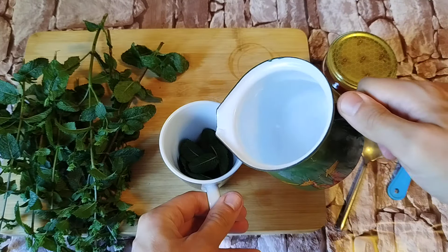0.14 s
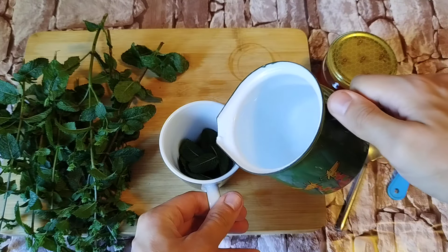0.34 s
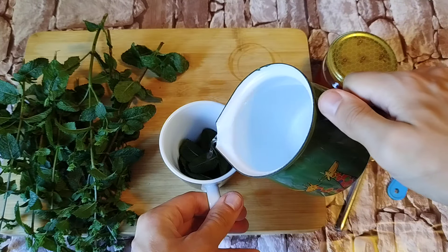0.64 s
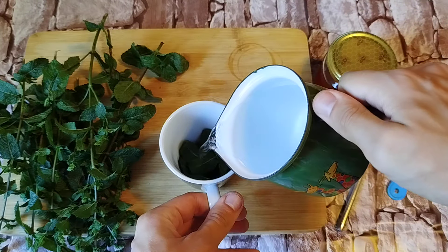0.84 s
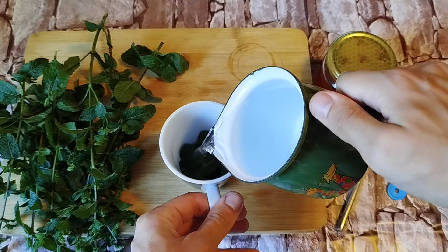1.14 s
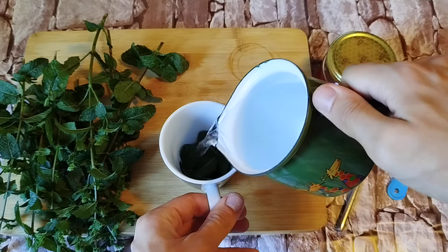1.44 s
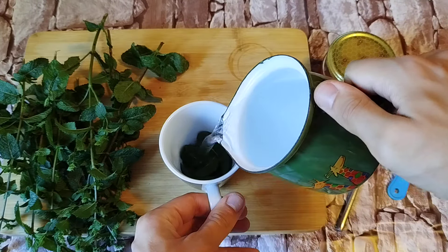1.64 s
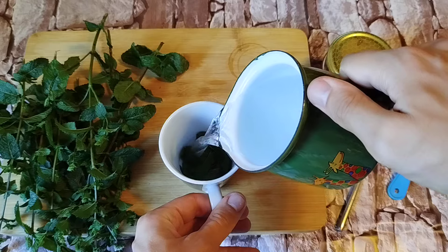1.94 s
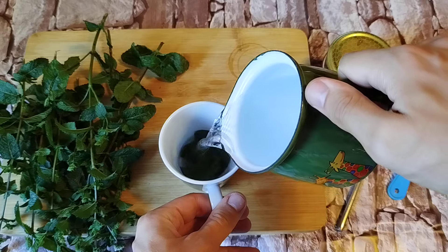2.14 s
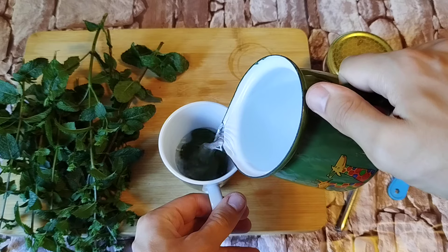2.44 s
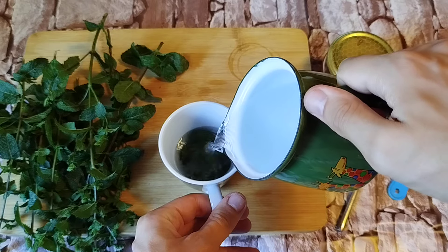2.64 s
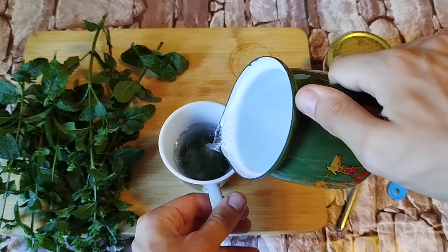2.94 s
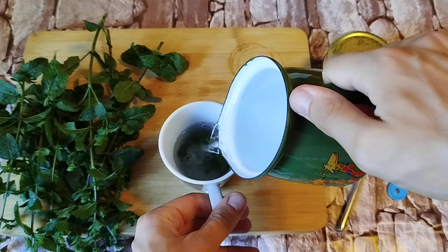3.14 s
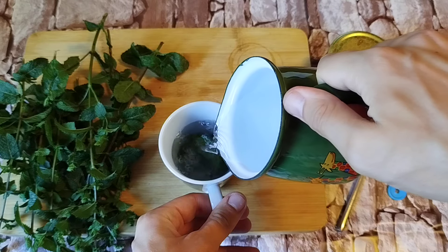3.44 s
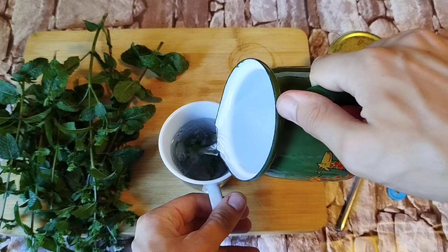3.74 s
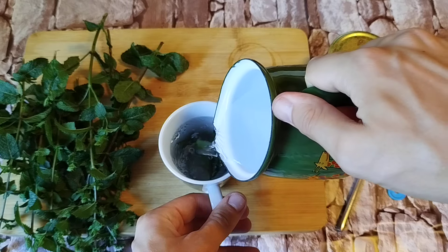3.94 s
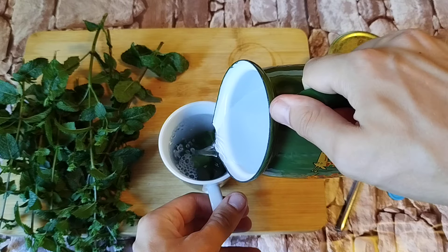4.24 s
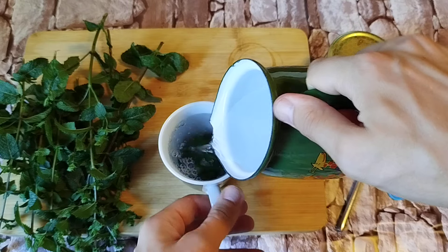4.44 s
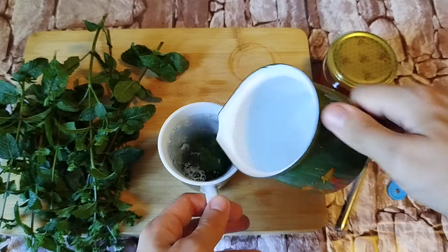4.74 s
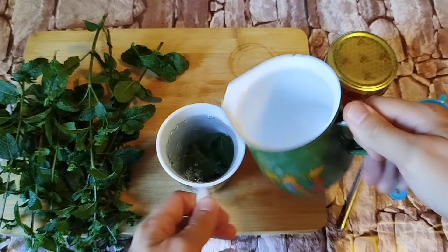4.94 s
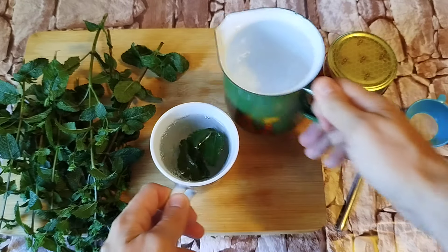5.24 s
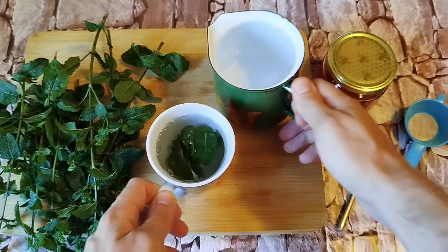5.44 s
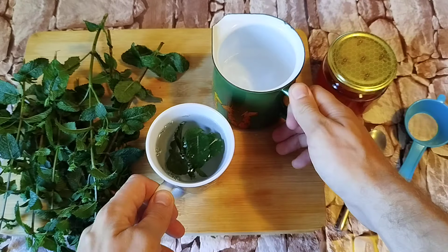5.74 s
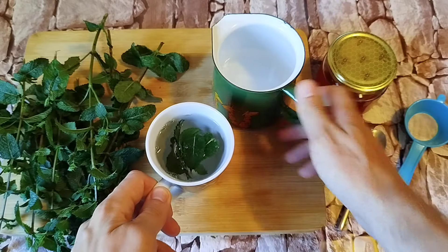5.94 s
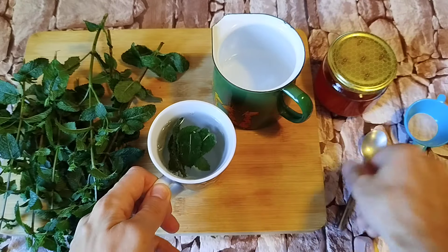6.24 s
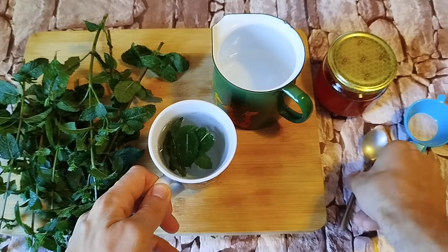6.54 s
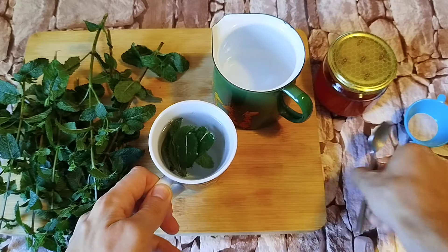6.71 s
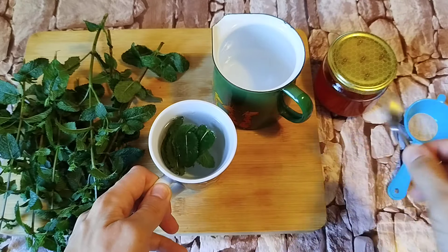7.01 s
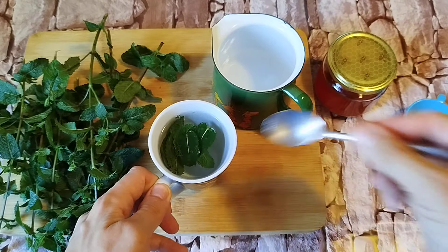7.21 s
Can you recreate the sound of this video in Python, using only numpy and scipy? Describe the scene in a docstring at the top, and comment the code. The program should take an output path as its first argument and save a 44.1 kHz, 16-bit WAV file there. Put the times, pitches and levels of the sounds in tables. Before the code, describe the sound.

Close stereo sound in a small quiet room: a short metallic bump, then about four seconds of uneven, gurgling water poured into a mug, strongest early on and thinning later, with crisp droplets on top. A sharp ceramic knock ends the pour. A short sliding scrape follows, then a low, solid thump of the metal jug on a board, small finger taps, a dragged spoon and a tiny high ring.

```python
"""A bump leaves a jug ringing; then hot water trickles from it onto mint leaves in a ceramic mug.
Bubbles, built from short swelling tones, sound through the shrinking air space; droplets tick.
The jug knocks the mug as it tips back: cracks of noise and fading tones. The mug is slid aside (shaped noise)
and the jug set down on a wooden board. Then a spoon is dragged off a mat and sings as it is lifted.
Soft noise throughout is the small quiet room, heard by a pair of close microphones."""
import sys
import numpy as np
from scipy import signal
from scipy.fft import rfft, irfft, next_fast_len
from scipy.io import wavfile
from scipy.ndimage import uniform_filter1d

SR = 44100
rng = np.random.default_rng(int(sys.argv[2]) if len(sys.argv) > 2 else 0)


def wrap_up_sound(samples):
    """Save the sound to the file named by the first command line argument, as 16-bit audio."""
    columns = np.atleast_2d(samples).T
    # keep every value between -1 and 1, then stretch to whole-number steps
    tamed = np.clip(columns, -1, 1)
    steps = np.round(tamed * 32767).astype(np.int16)
    wavfile.write(sys.argv[1], SR, steps)


N = 325017


def from_db(db):
    """Turn decibels into a gain."""
    return 10 ** (np.asarray(db) / 20)


def rms_one(x):
    """Scale a sound to an average (rms) level of 1."""
    return x / np.sqrt(np.mean(x ** 2) + 1e-20)


def at_hz(points, hz):
    """Read a table of (frequency, value), spacing frequencies as the ear does (log)."""
    f, value = np.transpose(points)
    return np.interp(np.log(hz + 1e-3), np.log(f), value)


def add(out, s, sound):
    """Mix a sound in, starting at s seconds."""
    i = max(round(s * SR), 0)
    out[..., i:i + sound.shape[-1]] += sound[..., :N - i]


def clicks(rows):
    """One single-sample click for each row of (time [s], level [dB])."""
    out = np.zeros(N)
    for s, db in rows:
        add(out, s, from_db([db]))
    return out


def decay(t60):
    """A second of fading; t60 is the time to fall by 60 dB [s]."""
    return np.exp(-np.log(1000) * np.arange(SR) / SR / t60)


def stroke(s, length_s, attack_s, release_s):
    """Gain of one push: it builds up, holds until its length is over and dies away."""
    age = np.arange(N) / SR - s
    return np.clip(age / attack_s, 0, 1) * np.exp(-np.maximum(age - length_s, 0) / release_s)


def flutter(depth_db, rate):
    """Uneven grip or sputter: the level wanders to a new random value rate times a second."""
    steps = np.arange(N) / SR * rate
    return from_db(depth_db * np.interp(steps, np.arange(N), rng.standard_normal(N)))


def resonator(hz, width):
    """One resonance as filter terms, and the gain that brings its peak to about 1."""
    r = np.exp(-np.pi * width / SR)
    poles = [1, -2 * r * np.cos(2 * np.pi * hz / SR), r * r]
    return [1, 0, -1], poles, (1 - r * r) / 2


def resonate(x, modes):
    """A body answers at several pitches at once: side-by-side resonances with alternating signs."""
    out = 0
    for k, (hz, width, db) in enumerate(modes):
        zeros, poles, gain = resonator(hz, width)
        out = out + (-1) ** k * from_db(db) * gain * signal.lfilter(zeros, poles, x + 1e-18)
    return out


# how alike left and right are for sounds from the table: (frequency [Hz], correlation)
LIKENESS = [(100, 0.975), (260, 0.92), (650, 0.7), (1100, 0.25), (4000, 0.0), (15000, 0.0)]


def noise(colour, size=N, likeness=LIKENESS):
    """Stereo hiss with a given balance of low and high, and a given left-right likeness; rms 1."""
    padded = next_fast_len(size)
    hz = np.arange(padded // 2 + 1) * SR / padded
    mid, side = rfft(rng.standard_normal((2, padded)))
    alike = np.clip(at_hz(likeness, hz), -1, 1)
    # the side part has opposite signs left and right, so it makes the ears differ
    pair = np.sqrt(1 + alike) * mid + np.sqrt(1 - alike) * side * [[1], [-1]]
    return rms_one(irfft(pair * from_db(at_hz(colour, hz)), padded)[:, :size])


# how long the room's echo takes to fall by 60 dB: (frequency [Hz], t60 [s])
ROOM_T60 = [(120, 0.41), (400, 0.4), (1000, 0.28), (4000, 0.41), (9000, 0.38), (15000, 0.27)]


def dying(colour):
    """A second of noise in which every band fades at the room's own rate."""
    hz, s, cells = signal.stft(noise(colour, size=SR), SR, nperseg=256)
    fade = from_db(-60 * s / at_hz(ROOM_T60, hz)[:, None])
    return signal.istft(cells * fade, SR)[1][:, :SR]


def place(x, lag_ms, pan_db, near_db, near_t60, wet_db):
    """Direct sound reaches the left microphone first; the mug's walls scatter it sideways, the room echoes."""
    late = np.interp(np.arange(N) - round(lag_ms * SR / 1000), np.arange(N), x)
    direct = np.array([x, late]) * from_db([[pan_db / 2], [-pan_db / 2]])
    near = rng.standard_normal(SR) * [[1], [-1]]
    far = rng.standard_normal((2, SR))
    answer = from_db(near_db) * rms_one(near * decay(near_t60))
    answer += from_db(wet_db) * rms_one(far * decay(at_hz(ROOM_T60, 2000)))
    return direct + signal.fftconvolve(x[None], answer / np.sqrt(SR), axes=1)[:, :N]


def pour():
    """The stream lands: bubbling water and snapping droplets, each placed before the microphones."""
    vigour = flow()
    return (place(water(vigour), lag_ms=0.099, pan_db=1.5, near_db=-6, near_t60=0.015, wet_db=-4)
            + place(droplets(vigour), lag_ms=.11, pan_db=2.5, near_db=-6.5, near_t60=0.071, wet_db=-3.5))


# vigour of the stream: it swells to its strongest near 2.5 s, then mostly slackens: (time [s], level [dB])
FLOW = [(0.75, -36), (1.15, -13.5), (1.45, -16), (1.78, -23.5), (2.1, -5.5), (2.45, -2), (2.75, -6.5),
        (2.98, -14), (3.18, -18), (3.33, -10.5), (3.65, -14), (4.15, -19.5), (4.64, -13.5)]
POUR_START_S, POUR_END_S = FLOW[0][0], FLOW[-1][0]
# moments when the stream drags a gulp of air under: (time [s], level [dB])
GULPS = [(1.877, -0.5), (2.367, 5), (2.525, -2), (2.8, -1.5), (3.11, -3), (3.289, 2.5), (3.475, 0)]
GULP_RISE_S, GULP_FALL_S = 0.026, 0.018


def flow():
    """Vigour of the stream as a gain: the slow tilt of the jug plus a short swell for each gulp."""
    s, db = np.transpose(FLOW)
    vigour = from_db(np.interp(np.arange(N) / SR, s, db, left=-150, right=-150))
    for s, db in GULPS:
        vigour += from_db(db) * stroke(s - GULP_RISE_S, GULP_RISE_S, GULP_RISE_S, GULP_FALL_S)
    return vigour


# each voice of the water: level where the flow is at 0 dB [dB], share of the flow's swing it follows
BUBBLING_DB, BUBBLING_FOLLOWS = -56, 0.89
FIZZ_DB, FIZZ_FOLLOWS = -62, 0.54
GURGLE_DB, GURGLE_FOLLOWS = -59.5, 1.31
# loud single bubbles, levels before the water's mix: (time [s], level [dB], pitch [Hz])
BUBBLES = [(1.135, -45, 2000), (1.236, -49.5, 1960), (1.385, -50, 890), (1.498, -51, 2050),
           (1.873, -40, 1895), (2.116, -45, 1180), (2.247, -43, 1110), (2.32, -35.5, 1184),
           (2.351, -44, 1110), (2.367, -39, 1270), (2.419, -42, 1190), (2.503, -38.5, 1270),
           (2.523, -31.5, 1217), (2.724, -45, 1140), (2.778, -47.5, 1250), (2.801, -52, 1480),
           (2.981, -45, 1910), (3.034, -46.5, 1180), (3.261, -44.5, 1140), (3.283, -42.5, 1260),
           (3.304, -34.5, 1904), (3.449, -43, 1920), (3.472, -45, 1770), (3.528, -43.5, 1360),
           (3.9, -39, 3140), (3.927, -47, 2000), (3.982, -43.5, 2960), (3.995, -48, 1930),
           (4.007, -48, 4320), (4.072, -45, 2990), (4.235, -45.5, 1880), (4.313, -47, 1870),
           (4.494, -43, 1770), (4.524, -41.5, 3520)]


def water(vigour):
    """Swarms of bubbles, fizz and low gurgle follow the flow; louder single bubbles ring on top."""
    large = BUBBLES + strays(count=14)
    bubbling = steady(mug_air(swarm(770, 2200, cycles=8.6, spread_db=15, count=900), column_db=-3.0))
    fizz = steady(mug_air(swarm(2397, 4410, cycles=25.5, spread_db=30, count=1500), column_db=-16))
    gurgle = steady(swarm(317, 847, cycles=6.6, spread_db=12, count=800))
    out = from_db(BUBBLING_DB) * vigour ** BUBBLING_FOLLOWS * bubbling
    out += from_db(FIZZ_DB) * vigour ** FIZZ_FOLLOWS * fizz
    out += from_db(GURGLE_DB) * vigour ** GURGLE_FOLLOWS * gurgle
    for s, db, hz in large:
        add(out, s - .0005, from_db(db - 1.0) * swelling_tone(hz, cycles=hz * 0.014, rise=.05))
    # each pinch-off also kicks the air in the mug
    kicks = clicks([row[:2] for row in large])
    return out + from_db(24.5) * resonate(kicks, AIR_MODES)


def swelling_tone(hz, cycles, rise):
    """Swells and dies within a set number of cycles; a bubble nearing the surface climbs in pitch (rise)."""
    age = np.arange(int(2 * cycles * SR / hz)) * hz / SR / cycles
    swell = age * np.exp(-8 * age)
    return swell / swell.max() * np.sin(2 * np.pi * cycles * (age + rise * (age - .5) * age / 2))


def swarm(low_hz, high_hz, cycles, spread_db, count):
    """Many small bubbles of random pitch, loudness and length during the pour."""
    out = np.zeros(N)
    for when, pitch, big, life in rng.random((count, 4)):
        hz = low_hz * (high_hz / low_hz) ** pitch
        sound = swelling_tone(hz, cycles * (.5 + life), rise=0.13)
        s = POUR_START_S + when * (POUR_END_S - POUR_START_S)
        add(out, s, from_db(spread_db * big ** 2) * sound)
    return out


# once the water is deep enough (start [s]), lesser bubbles join: level before the mix [dB], pitch range [Hz]
POOL_S, STRAY_DB, STRAY_LOW_HZ, STRAY_HIGH_HZ = 2.3, -54, 1520, 3330


def strays(count):
    """Lesser bubbles, one at a random moment in each equal share of the later pour."""
    when, pitch = rng.random((count, 2)).T
    s = POOL_S + (np.arange(count) + when) / count * (POUR_END_S - POOL_S)
    hz = STRAY_LOW_HZ * (STRAY_HIGH_HZ / STRAY_LOW_HZ) ** pitch
    return list(zip(s, np.full(count, STRAY_DB), hz))


def steady(x):
    """Even out the slow level of a stream of tiny sounds, leaving each tiny sound itself."""
    return x / np.sqrt(np.abs(uniform_filter1d(x * x, SR // 8)) + np.mean(x * x) / 100)


# lowest air resonance of the mug as it fills: (time [s], pitch [Hz])
AIR_PITCH = [(1.3, 905), (2.4, 1247), (3.0, 1332), (4.2, 1540)]


def air_column(x, width_hz, size=128):
    """The mug's lowest air resonance rises with the water; it is retuned every few milliseconds."""
    out, state = np.zeros(N), np.zeros(2)
    starts = np.arange(0, N, size)
    for i, hz in zip(starts, np.interp(starts / SR, *np.transpose(AIR_PITCH))):
        zeros, poles, gain = resonator(hz, width_hz)
        out[i:i + size], state = signal.lfilter(zeros, poles, x[i:i + size] + 1e-18, zi=state)
    return out * gain


# cross resonances of the mug's air: (frequency [Hz], width [Hz], level [dB])
AIR_MODES = [(1900, 148, -1.5), (2660, 970, -7), (2966, 180, 1), (3560, 180, -3), (4610, 930, -10.5)]


def mug_air(x, column_db):
    """Sound made at the water's surface leaves through the mug's air."""
    return from_db(column_db) * air_column(x, width_hz=153) - resonate(x, AIR_MODES)


# fine spray: level where the flow is at 0 dB, before flutter [dB], share of the flow's swing it follows
SPRAY_DB, SPRAY_FOLLOWS = -64, 0.38
# loud droplets on the surface, levels before the droplets' mix: (time [s], level [dB], pitch [Hz])
DROPS = [(0.7566, -42, 9660), (1.0706, -43.5, 10700), (1.4865, -40, 11200), (1.592, -37, 9350),
         (1.8712, -40, 6960), (1.9999, -40, 9900), (2.0694, -35.5, 9600), (2.2592, -37.5, 9440),
         (2.366, -31.5, 9750), (2.4695, -30.5, 7500), (2.5435, -35.5, 10900), (2.698, -39, 7700),
         (2.8897, -36, 8100), (3.032, -31, 12900), (3.475, -28, 8300), (3.7187, -39, 14800),
         (3.8997, -41, 7560), (4.466, -42, 10100)]
# colour of a droplet's snap: (frequency [Hz], width [Hz], level [dB])
SNAP = [(2800, 6900, -9), (7490, 2550, -3), (9700, 1420, -2), (14000, 2660, -3.5)]


def droplets(vigour):
    """Landing droplets snap and ring briefly over a mist of the finest bubbles."""
    # the finest bubbles tick, each at a pitch of its own
    mist = steady(resonate(swarm(4240, 17600, cycles=14, spread_db=22.5, count=3000), SNAP))
    out = from_db(SPRAY_DB) * vigour ** SPRAY_FOLLOWS * flutter(depth_db=2.5, rate=45) * mist
    hits = clicks([row[:2] for row in DROPS]) + spatter(count=60)
    out += from_db(12.5) * resonate(splashed(hits), SNAP)
    for s, db, hz in DROPS:
        add(out, s, from_db(db - 4.0) * swelling_tone(hz, cycles=13, rise=0))
    return out


# lesser droplets, before the droplets' mix: the faintest [dB], how far others rise above it [dB]
SPATTER_DB, SPATTER_RANGE_DB = -50.5, 6.5


def spatter(count):
    """Clicks of the lesser droplets at random moments, most of them faint."""
    when, size = rng.random((count, 2)).T
    s = POUR_START_S + when * (POUR_END_S - POUR_START_S)
    return clicks(zip(s, SPATTER_DB + SPATTER_RANGE_DB * size ** 2))


# a droplet's spray: level beside its click [dB], fading time t60 [s]
SPLASH_DB, SPLASH_T60 = 3, 0.029


def splashed(hits):
    """Each click throws a brief spray: a burst of noise that fades within a few hundredths of a second."""
    burst = rms_one(rng.standard_normal(SR) * decay(SPLASH_T60)) / np.sqrt(SR)
    return hits + from_db(SPLASH_DB) * signal.oaconvolve(hits, burst[:SR // 10])[:N]


def ringing(modes):
    """Struck things ring in fading tones; the higher ones reach the two microphones out of step."""
    out, t = np.zeros((2, SR)), np.arange(SR) / SR
    for k, (hz, db, t60) in enumerate(modes):
        alike = np.clip(at_hz(LIKENESS, hz), -1, 1)
        apart = np.arccos(alike) * (1 if alike > .5 else rng.choice([-1, 1]))
        phase = np.array([[apart], [-apart]]) / 2
        out += (-1) ** k * from_db(db) * decay(t60) * np.sin(2 * np.pi * hz * t + phase)
    return out


def blow(contacts, modes, board, colour, ring_db, board_db, crack_db, crack_t60, tail_db, rise_s):
    """Each contact cracks and echoes in the room; the hardest one sets the vessel and the board ringing."""
    out = np.zeros((2, N))
    onset = 1 - np.exp(-np.arange(SR) / SR / rise_s)
    for s, db in contacts:
        crack = from_db(crack_db) * noise(colour, size=SR) * decay(crack_t60)
        add(out, s, from_db(db) * onset * (crack + from_db(tail_db) * dying(colour)))
    body = from_db(ring_db) * ringing(modes) + from_db(board_db) * ringing(board)
    hardest_s = max(contacts, key=lambda row: row[1])[0]
    add(out, hardest_s, onset * body)
    return out


# the contact of the bump: (time [s], level [dB])
BUMP = [(0.0005, 0.5)]
# tones of the full jug, and of the board, before each blow's own level: (pitch [Hz], level [dB], t60 [s])
FULL_JUG = [(257.5, -43.5, 0.25), (339, -49, 0.35), (405, -42.5, 0.4), (887, -36, 0.22), (955, -43.5, 0.38),
            (2830, -35.5, 0.3), (3420, -52, 0.24), (3640, -47, 0.26), (4770, -49, 0.26), (5170, -37, 0.071),
            (8250, -51, 0.31)]
BOARD = [(122, -4, 0.19), (156.5, -0.5, 0.3), (273.3, 6.5, 0.079), (452.5, -5.5, 0.2), (1007, 5.5, 0.067)]
# dense clatter of the bump: (frequency [Hz], level [dB per Hz])
BUMP_COLOUR = [(41, -54), (70, -24), (145, -2.5), (412, -5.5), (541, -15), (913, -4.5), (1690, -33),
               (2910, -16), (3910, -24.5), (8280, -24.5), (16000, -48)]


def jug_bump():
    """The early bump sets the full jug ringing, with a short clatter."""
    return blow(BUMP, FULL_JUG, BOARD, BUMP_COLOUR, ring_db=-0.5, board_db=-41,
                crack_db=-26, crack_t60=0.037, tail_db=-39.0, rise_s=0.00017)


# contacts of the jug on the mug: (time [s], level [dB])
MUG_KNOCK = [(4.6658, -1.5), (4.6683, 1.5), (4.676, 1.5)]
# tones of the mug, before the knock's own level: (pitch [Hz], level [dB], t60 [s])
MUG = [(758, -52.5, 0.27), (828, -19, 0.24), (974, -29, 0.19), (1004, -32.5, 0.18), (1736, -28.5, 0.33),
       (2246, -31.5, 0.13), (2402, -30.5, 0.3), (2466, -48, 0.65), (3050, -52, 0.21), (3120, -27.5, 0.29),
       (3630, -23.5, 0.16), (4074, -28, 0.19), (4500, -40, 0.36), (4530, -30, 0.24), (5080, -35.5, 0.29),
       (5030, -28, 0.25), (5150, -33.5, 0.3), (5462, -42, 0.41), (6020, -38, 0.47), (5940, -20.5, 0.13),
       (7040, -34, 0.19), (7060, -38, 0.07), (7260, -20.5, 0.11), (8200, -59, 0.24), (9700, -27, 0.16),
       (9500, -51, 0.42), (10100, -47, 0.48)]
# dense clatter of the knock: (frequency [Hz], level [dB per Hz])
MUG_COLOUR = [(29, -54), (50, -29), (138, -3), (439, -10.5), (532, -17), (842, -1.5), (905, -26),
              (1020, -6), (1330, -22.5), (1740, -21.5), (2010, -18.5), (3580, -21), (3850, -25.5),
              (7210, -23), (16000, -33)]


def mug_knock():
    """The hard knock makes the mug ring; glaze on enamel adds a short bright crack."""
    out = blow(MUG_KNOCK, MUG, BOARD, MUG_COLOUR, ring_db=-4, board_db=-21.5,
               crack_db=-19.5, crack_t60=0.056, tail_db=-30, rise_s=0.0008)
    # colour of the glaze's crack: (frequency [Hz], level [dB per Hz])
    glaze = noise([(1500, -1.5), (4000, -5), (7500, 0.5), (11000, -1.5), (16000, -1.0)], size=SR)
    add(out, MUG_KNOCK[0][0], from_db(-17.5) * glaze * decay(0.042))
    return out


# contacts of the jug on the board: (time [s], level [dB])
JUG_DOWN = [(5.6808, 3.5), (5.6995, -13.5)]
# tones of the jug, and of the board's centre, before the blow's own level: (pitch [Hz], level [dB], t60 [s])
JUG_ON_BOARD = [(352, -42, 0.64), (403, -26.5, 0.24), (590, -41, 0.25), (699, -13, 0.32), (800, -36, 0.23),
                (1450, -36, 0.2), (3338, -58, 0.32), (4731, -51.5, 0.34), (5360, -47.5, 0.38),
                (6000, -54, 0.44), (9500, -48, 0.38), (13400, -54, 0.36), (15286, -54, 0.26)]
BOARD_CENTRE = [(126.4, -3, 0.65), (157, -11.5, 0.14), (200, -5, 0.067), (252.5, 1.5, 0.29),
                (630, -4.5, 0.08)]
# dense clatter of the landing: (frequency [Hz], level [dB per Hz])
JUG_COLOUR = [(29, -92), (50, -47), (108, -8.5), (252, -9.5), (291, -18.5), (398, -7.5), (507, -18.5),
              (694, -4.5), (973, -19), (2320, -32.5), (5020, -55), (5530, -44), (6710, -52.5),
              (9180, -45.5), (16000, -83)]
# the jug's foot settles flat: time [s], and its tones (pitch [Hz], level [dB], t60 [s])
SETTLE_S = 5.857
SETTLE = [(192, -45, 0.15), (281, -44.5, 0.21), (375, -53, 0.16)]


def jug_landing():
    """The jug lands more dully on wood, then its foot settles with a few low tones."""
    out = blow(JUG_DOWN, JUG_ON_BOARD, BOARD_CENTRE, JUG_COLOUR, ring_db=-4.0, board_db=-31.5,
               crack_db=-20.5, crack_t60=0.045, tail_db=-28.5, rise_s=0.00093)
    add(out, SETTLE_S, ringing(SETTLE))
    return out


# the mug's one push: start, length (build-up included), build-up and release [s]
SLIDE_S, SLIDE_LENGTH_S, SLIDE_ATTACK_S, SLIDE_RELEASE_S = 4.92, 0.17, 0.08, 0.042
# rasp of the mug's foot: (frequency [Hz], level [dB per Hz])
RUB_COLOUR = [(1500, -6), (3200, -2), (4800, -8), (6800, 1), (10000, 3), (16000, -6)]
# resonances of the rubbed mug: (frequency [Hz], width [Hz], level [dB])
RUB_MODES = [(710, 16, 9), (1100, 32, -1), (2910, 11, 12), (3520, 27, 4.5), (6340, 30, 10.5),
             (7200, 100, 0)]


def slide():
    """The mug is slid a little way over the board: its foot rasps, its wall and the wood answer."""
    push = stroke(SLIDE_S, SLIDE_LENGTH_S, SLIDE_ATTACK_S, SLIDE_RELEASE_S)
    wall = rms_one(resonate(rng.standard_normal((2, N)), RUB_MODES))
    rasp = from_db(-57) * noise(RUB_COLOUR) + from_db(-58) * wall
    rumble = from_db(-58) * noise(THUMP, likeness=ROOM_LIKENESS)
    return push * (rasp + rumble) * flutter(depth_db=2.0, rate=160)


# the jug's faint ring as the hand lets go: time [s], and its tones (pitch [Hz], level [dB], t60 [s])
LET_GO_S = 6.005
LET_GO = [(1070, -61.5, 0.46), (2620, -68, 0.25), (3870, -67, 0.23), (7300, -67, 0.28)]
# pulls that drag the spoon off the mat: (time [s], length [s], level [dB])
PULLS = [(6.438, 0.038, -54), (6.519, 0.048, -61.5), (6.592, 0.028, -59), (6.636, 0.081, -55.5)]
PULL_ATTACK_S, PULL_RELEASE_S = 0.021, 0.028
# the spoon's scrape: (frequency [Hz], level [dB per Hz])
DRAG_COLOUR = [(470, -30.5), (800, -6.5), (1290, -16), (2910, 0), (5110, -2), (6170, -1.5), (9570, -1),
               (16000, -21)]
# small taps of fingers and spoon: (time [s], click level [dB], thump level [dB])
TAPS = [(0.324, -66, -61.5), (0.359, -71, -59), (4.924, -58, -56), (6.004, -57.5, -61), (6.319, -69, -67),
        (6.405, -60, -56), (6.463, -45, -62), (6.528, -48, -47.5), (6.635, -36, -61), (6.917, -89, -57.5),
        (7.297, -59, -61)]
# dull answer of the table top: (frequency [Hz], level [dB per Hz])
THUMP = [(60, -9), (130, 1), (300, 5), (480, -5), (1200, -10), (4000, -36)]
# the lifted spoon sings: (time [s], pitch [Hz], level [dB])
SPOON = [(7.19, 9770, -68.5), (7.224, 7700, -72.5)]


def handling():
    """Fingers let go of the jug and tap; scraping noise drags the spoon, pure tones ring as it is lifted."""
    out = np.zeros((2, N))
    add(out, LET_GO_S, ringing(LET_GO))
    drag = sum(from_db(db) * stroke(s, length_s, PULL_ATTACK_S, PULL_RELEASE_S) for s, length_s, db in PULLS)
    spoon = drag * noise(DRAG_COLOUR) * flutter(depth_db=2.0, rate=120)
    for s, click_db, thump_db in TAPS:
        add(spoon, s, from_db(click_db) * noise(DRAG_COLOUR, size=SR) * decay(0.027))
        add(out, s, from_db(thump_db) * noise(THUMP, size=SR) * decay(0.3))
    for s, hz, db in SPOON:
        add(spoon, s, from_db(db) * swelling_tone(hz, cycles=1100, rise=0))
    # the spoon is slightly to the right
    return out + spoon * from_db([[-0.4], [0.4]])


# colour of the quiet room: (frequency [Hz], level [dB per Hz])
ROOM_TONE = [(18, -70), (30, -40), (70, -51.5), (88, -9.5), (145, -4.5), (189, -8.5), (449, -12.5),
             (666, -15), (889, -15.5), (1190, -19), (1390, -20.5), (2900, -25.5), (6210, -28), (8080, -35),
             (16000, -29.5)]
# how alike left and right are in the quiet room: (frequency [Hz], correlation)
ROOM_LIKENESS = [(100, 0.373), (200, 0.21), (380, 0.45), (700, 0), (1300, 0.022)]


def quiet_room():
    """The room's soft background: steady noise, mostly low."""
    return from_db(-61.5) * noise(ROOM_TONE, likeness=ROOM_LIKENESS)


def scene():
    """Everything over the quiet room."""
    return pour() + jug_bump() + mug_knock() + jug_landing() + slide() + handling() + quiet_room()


# dips of the microphone ports: (frequency [Hz], width [Hz])
PORT_DIPS = [(6150, 324), (12500, 660)]


def record(dry):
    """The left microphone is a little keener; the ports notch the treble; rumble and the very top are cut."""
    dry = dry * from_db([[.5], [-.5]])
    for hz, width in PORT_DIPS:
        dry = signal.lfilter(*signal.iirnotch(hz, hz / width, fs=SR), dry)
    # keep 100 Hz to 16 kHz
    dry = signal.sosfilt(signal.butter(6, 100, "high", fs=SR, output="sos"), dry)
    return signal.sosfilt(signal.ellip(10, .2, 80, 16000, fs=SR, output="sos"), dry)


dry = scene()
out = record(dry)
wrap_up_sound(out)
```